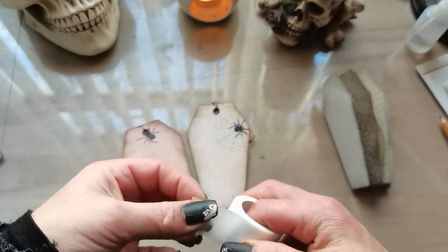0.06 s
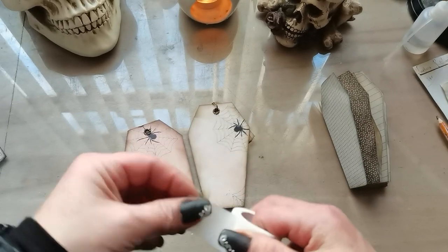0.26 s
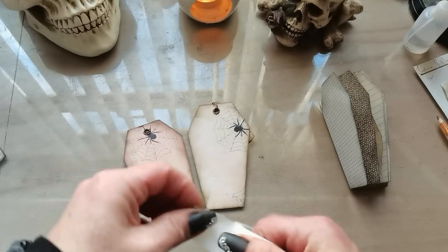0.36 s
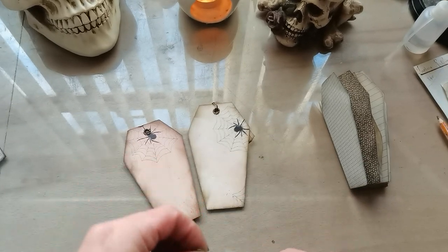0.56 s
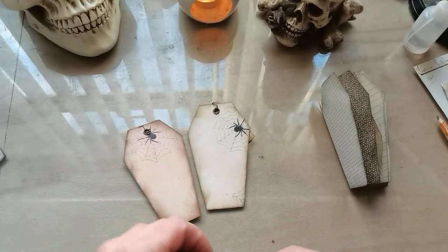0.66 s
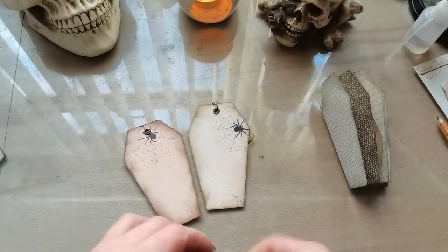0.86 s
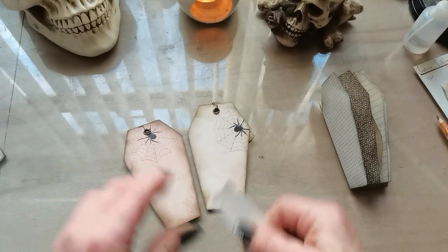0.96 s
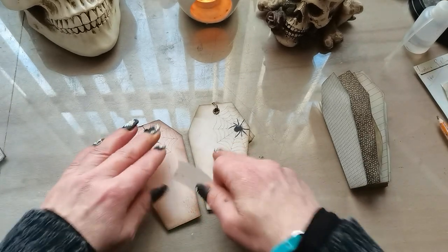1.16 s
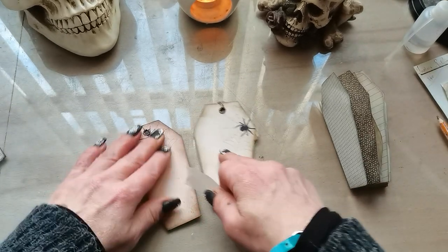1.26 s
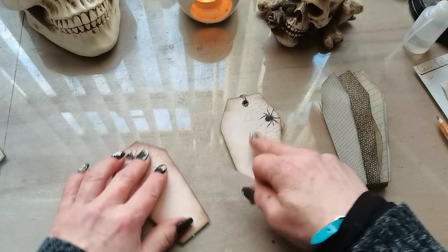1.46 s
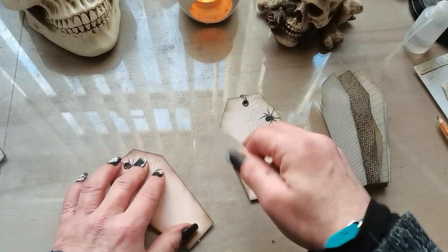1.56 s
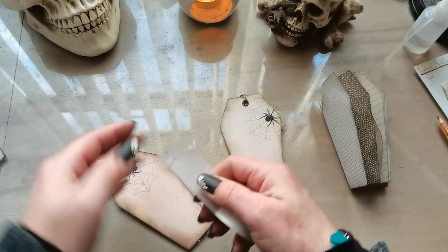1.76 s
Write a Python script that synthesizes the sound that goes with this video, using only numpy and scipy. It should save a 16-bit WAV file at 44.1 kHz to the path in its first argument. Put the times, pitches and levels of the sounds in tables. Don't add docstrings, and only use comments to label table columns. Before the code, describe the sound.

Dry, sharp rasps of paper tape being pulled and torn, followed by light card taps

```python
import sys
import numpy as np
from scipy import signal
from scipy.fft import rfft, irfft, next_fast_len
from scipy.io import wavfile
from scipy.ndimage import map_coordinates

SR = 44100
rng = np.random.default_rng(int(sys.argv[2]) if len(sys.argv) > 2 else 0)


def pcm_store(signal):
    levels = np.round(np.clip(np.atleast_2d(signal), -1, 1) * 32767)
    wavfile.write(sys.argv[1], SR, levels.astype(np.int16).T)


def field_ratio(decibels):
    return 10 ** (np.asarray(decibels, dtype=float) / 20)


N = 79380


def unit(x):
    return x / np.sqrt(np.mean(x ** 2) + 1e-20)


def along(points, hz):
    f, v = np.transpose(points)
    return np.interp(np.log(hz + 1), np.log(f + 1), v)


def wobble(rate):
    knots = rng.standard_normal(int(N * rate / SR) + 4)
    return map_coordinates(knots, [np.arange(N) * rate / SR])


def filtered(x, response):
    m = next_fast_len(N + SR // 2)
    return irfft(rfft(x, m) * response(np.fft.rfftfreq(m, 1 / SR)), m)[..., :N]


def causal(spectrum):
    def response(hz):
        cep = irfft(np.log(field_ratio(along(spectrum, hz))))
        half = len(cep) // 2
        cep[1:half] *= 2
        cep[half + 1:] = 0
        h = np.exp(rfft(cep))
        return h / np.sqrt(np.mean(np.abs(h) ** 2))
    return response


def sides(pan_db):
    return field_ratio(np.array([pan_db / 2, -pan_db / 2]))


# [f/Hz, level/dB]
HUM_COLOUR = [(30, 1), (210, -5), (330, -12), (1530, -23), (5380, -28), (7520, -21), (10300, -25),
              (16000, -29)]
# [f/Hz, likeness 0..1]
HUM_LIKENESS = [(40, 0.49), (300, 0.34), (8000, 0.12)]
HUM_DB = -66


def hum():
    def middle_and_side(hz):
        turn = np.arccos(np.clip(along(HUM_LIKENESS, hz), -1, 1)) / 2
        return field_ratio(along(HUM_COLOUR, hz)) * [np.cos(turn), np.sin(turn)]

    mid, side = filtered(rng.standard_normal((2, N)), middle_and_side)
    level = field_ratio(HUM_DB + 0.93 * wobble(5.64))
    return level * unit(np.array([mid + side, mid - side]))


# [f/Hz, fade time/s]
ROOM_FADE = [(300, 0.033), (1000, 0.23), (4000, 0.2), (7500, 0.17), (14000, 0.19)]


def room(x):
    hz, t, z = signal.stft(rng.standard_normal((2, SR // 3)), SR, nperseg=128)
    fade = field_ratio(-60 * t / along(ROOM_FADE, hz)[:, None])
    tail = signal.istft(z * fade, SR, nperseg=128)[1]
    late = np.pad(x, (90, 0))
    return signal.fftconvolve(late[None], tail / np.linalg.norm(tail[0]), axes=1)[:, :N]


# [t/s, length/s, f/Hz, level/dB]
ARM_RUBS = [(0.13, 0.14, 53, -64.5), (0.13, 0.11, 200, -70.5), (0.039, 0.011, 700, -60.5),
            (0.25, 0.013, 3200, -60.5), (0.77, 0.15, 1000, -71.5), (1.6, 0.14, 110, -68.5),
            (0.9165, 0.0099, 730, -47.5), (0.42, 0.24, 48, -61), (0.985, 0.16, 52, -65),
            (1.8, 0.18, 81, -64), (0.974, 0.17, 235, -61.5), (1.128, 0.12, 270, -64),
            (1.05, 0.36, 2350, -72), (1.362, 0.029, 2200, -71), (1.37, 0.051, 2800, -67.5),
            (1.198, 0.33, 170, -60.5)]


def arms():
    t = np.arange(N) / SR
    out = 0
    for s, length, hz, db in ARM_RUBS:
        swell = np.exp(-8 * ((t - s) / length) ** 2)
        out = out + field_ratio(db) * swell * np.sin(2 * np.pi * hz * t + 1.56 * wobble(hz / 3))
    return out


def ring(modes, pitch=1):
    t = np.arange(SR // 4) / SR
    out = 0
    for hz, db, t60 in modes:
        out = out + field_ratio(db + rng.normal(0, 3.2) - 60 * t / t60) * np.sin(2 * np.pi * pitch * hz * t)
    return out


# [t/s, edge level/dB, thud level/dB, edge pitch factor]
CARD_TAPS = [
    (1.1775, -24.5, -43, 1.01),
    (1.182, -57, -50, 0.76),
    (1.187, -52, -42.5, 1.001),
    (1.2684, -31.5, -59, 1.163),
    (1.726, -74.5, -55.5, 0.9),
]
# [f/Hz, level/dB, fade time/s]
EDGE_TONES = [(2610, -17, 0.0099), (3965, 11, 0.0076), (5130, -0.5, 0.008), (6800, -2, 0.0051)]
# [f/Hz, level/dB, fade time/s]
TABLE_TONES = [(80.5, -4, 0.14), (189, 0.5, 0.038), (246.5, -1.5, 0.051), (376, -4.5, 0.068),
               (630, -5.5, 0.029)]
# [t/s, length/s, starting f/Hz, level/dB]
TAPE_SQUEAKS = [
    (0.271, 0.027, 691, -62.5),
    (1.716, 0.15, 2200, -68.5),
]


def card():
    out, t = np.zeros(N + SR), np.arange(SR // 4) / SR
    for s, edge_db, thud_db, pitch in CARD_TAPS:
        click = field_ratio(edge_db) * ring(EDGE_TONES, pitch) * np.tanh(t / 0.00034)
        thud = field_ratio(thud_db) * ring(TABLE_TONES) * (1 - np.exp(-t / 0.0026))
        out[round(s * SR):][:len(t)] += click - thud
    for s, length, hz, db in TAPE_SQUEAKS:
        swell = np.sin(np.pi * np.clip(t / length, 0, 1))
        phase = 2 * np.pi * hz * t * (1 - 0.29 * t) + 1.7 * wobble(120)[:len(t)]
        out[round(s * SR):][:len(t)] += field_ratio(db) * swell * np.sin(phase)
    return out[:N] * np.ones((2, 1))


# [centre t/s, length/s, level/dB, left-right pan/dB]
STROKES = [(0.046, 0.09, -59, -1.5), (0.279, 0.043, -59, -12), (0.546, 0.099, -37, 16),
           (0.767, 0.16, -49.5, -1), (0.856, 0.092, -40.5, -4), (0.91, 0.047, -38.5, -5),
           (0.98, .12, -74, 7), (1.087, 0.029, -76, -1), (1.123, 0.11, -59, -4), (1.281, 0.063, -47, 5.5),
           (1.378, 0.15, -51, 0), (1.459, 0.19, -62.5, -3.5), (1.572, 0.06, -71.5, 1.5),
           (1.647, 0.099, -64, 11.5), (1.734, 0.17, -63.5, 0)]
# [f/Hz, level/dB]
RUB_COLOUR = [(500, -31), (1640, -21), (4000, -15), (7400, 2), (9000, -7.5), (10300, -2), (13000, -13),
              (16500, -17)]
QUICK_S = 0.1


def fingers():
    t = np.arange(N) / SR
    grain_db = 2.25 * rng.exponential(1, N) + 1.18 * wobble(39.93) + 1.7 * wobble(280)
    grit = field_ratio(grain_db) * rng.standard_normal((3, N))
    pair = unit(filtered(0.56 * grit[0] + 0.88 * grit[1:], causal(RUB_COLOUR)))
    strokes = 0
    for s, length, db, pan_db in STROKES:
        onset = 220 if length < QUICK_S else 30
        steepness = np.where(t < s - 0.2 * length, onset, 5)
        swell = np.exp(-steepness * ((t - s) / length + 0.18) ** 2)
        strokes = strokes + field_ratio(db) * sides(pan_db)[:, None] * swell
    return pair * strokes


SPIKE = 1.2
SPIKY_DB = 2
NEAR_DB, NEAR_S = -13.5, 0.029


def cluster(t, ms, count):
    span = max(ms, 0.2) / 1000
    shape = np.exp(-np.abs(t) / span * np.where(t < 0, 3.5, 2.2))
    after = field_ratio(NEAR_DB - 60 * t / NEAR_S) * (t > 0)
    size = field_ratio(SPIKY_DB * rng.exponential(1, len(t))) * rng.standard_normal((count, len(t)))
    size = size / np.sqrt((shape * size ** 2).sum(axis=1, keepdims=True) / shape.sum())
    return (shape + after) * np.where(shape == shape.max(), SPIKE, size)


# [t/s, crack level/dB, roll core level/dB, roll wall level/dB, cluster length/ms] # tape
JERKS = [(0.1908, -27.5, -68, -47.5, 0.46), (0.214, -22.5, -54.5, -41.5, 1.5), (0.2638, -44, -87, -79, 5.3),
         (0.2679, -39.5, -84, -63, 1.5), (0.2751, -44, -82, -68, 2.7), (0.2887, -50, -78, -74, 6.5),
         (0.3471, -40.5, -60, -73.5, 1), (0.3698, -33.5, -48, -57, 1), (0.3734, -20.5, -39, -37, 1.3),
         (0.383, -29, -54, -51.5, 1.3), (0.393, -33.5, -58, -44, 2.8), (0.3996, -31, -50, -36.5, 0.75),
         (0.4009, -16.5, -39.5, -33, 2.95), (0.4031, -26, -29.5, -46.5, 0.39),
         (0.4075, -36, -45, -63.5, 1.8), (0.4113, -42.5, -47, -64, 3.4), (0.4273, -25.5, -40.5, -38, 3.4),
         (0.4467, -35.5, -40.5, -47.5, 1.1), (0.4688, -28, -45, -42.5, 1.4),
         (0.5, -26.5, -38, -41, 0.82), (0.503, -19.5, -42.5, -36, 1.7), (0.5084, -14.5, -40, -38.5, 0.47),
       (0.5113, -17, -45.5, -56, 0.81), (0.5256, -15, -31, -29, 1.5), (0.5287, -30, -57, -34, 2.8),
       (0.5359, -27.5, -44, -38.5, 5.9), (0.5425, -21, -34, -28.5, 1.6), (0.549, -11, -43, -24.5, 0.34),
       (0.557, -11.5, -33, -29, 0.88), (0.57, -15, -36, -29.5, 2),
         (0.8127, -46.5, -63.5, -69, 27), (0.836, -32.5, -46.5, -47, 1.13), (0.8461, -32.5, -56, -54, 0.96),
        (0.8532, -28, -49.5, -50, 1.25), (0.8593, -24.5, -53, -46.5, 0.35), (0.8853, -42, -61, -58, 9.3),
        (0.8973, -41.5, -58, -53, 0.6), (0.8989, -41, -48, -50, 0.93), (0.9078, -35, -44, -39, 0.7),
        (0.9098, -23.5, -48, -41.5, 0.42), (0.9154, -20.5, -45.5, -40.5, 2.7),
        (0.9162, -14, -43.5, -41, 0.4), (0.9187, -31, -48, -41, 1.1), (0.9273, -52, -69, -54, 2)]
TICKS = [(0.0322, -45, -73, -74, 2.3), (0.089, -55.5, -76, -75, 6.2), (1.1053, -53.5, -63.5, -69.5, 3.7),
         (1.178, -45, -43.5, -28, 0.88), (1.1849, -27.5, -42.5, -39, 2.8), (1.1934, -38.5, -65, -54, 2.3),
         (1.2685, -33, -83, -50, 0.7), (1.2807, -34, -66, -48, 0.72), (1.342, -54, -100, -78, 3.4),
         (1.361, -45.5, -90, -52.5, 5.8), (1.3864, -42, -87, -51, 0.42), (1.511, -51.5, -80, -71, 0.8),
         (1.635, -49, -82, -82.5, 2.5), (1.6557, -37.5, -87, -80, 0.76)]
# [t/s, level/dB, length/ms]
SPARKS = [
    (0.2144, -44, 3.3),
    (0.2635, -39, 3.5),
    (0.4016, -18.5, 2.2),
    (0.4075, -28, 2.9),
    (0.4122, -31, 3),
    (0.5418, -20, 4.1),
    (0.836, -28, 0.91),
    (0.8995, -45, 2),
    (1.1925, -51, 2.5),
]
# [t/s, treble level/dB, left-right lean/dB]
FACING = [(0.03, -11, 2.5), (0.2, -3, 1), (0.38, 2, 0.5), (0.405, 2, -2.5), (0.428, 5, -1.5),
          (0.447, 11.5, 9), (0.47, 9.5, -2), (0.503, -1.5, -3.5), (0.53, 1, -2), (0.57, -2.5, 0),
          (0.82, 1, 3.5), (0.9, 2, -0.5), (0.917, -5.5, 8.5), (1.1, 6, -1.5), (1.185, 6.5, 0.5),
          (1.268, -5, 1), (1.282, 5, -9), (1.64, -8, 2)]
# [f/Hz, level/dB]
CRACK_COLOUR = [(2000, -41), (5400, -18.5), (6500, -7), (7500, 4), (8600, -9), (9400, -16), (12000, -33)]
# [f/Hz, level/dB]
SHEEN_COLOUR = [(6000, -34.5), (8800, -12.5), (10300, 2), (11500, -3.5), (14500, -11), (15800, -18),
                (17000, -34)]
# [f/Hz, level/dB]
FIZZ_COLOUR = [(8000, -35), (11000, -5.5), (12500, -7), (15500, -13.5), (17000, -17)]
# [f/Hz, level/dB]
CORE_COLOUR = [(120, -63), (350, -15.5), (650, -7), (950, -3.5), (1300, -6.5), (1800, -14.5), (3000, -32.5)]
# [f/Hz, level/dB]
WALL_COLOUR = [(1500, -41), (1900, -13), (2700, -6), (3400, -8.5), (4200, 3.5), (5300, -7), (7000, -23.5)]
SHEEN_DB, BODY_DB = -3, 1.37


def snaps():
    cracks, fizz = np.zeros((2, N + SR)), np.zeros((2, N + SR))
    core, wall = np.zeros(N + SR), np.zeros(N + SR)
    t = np.arange(SR // 20) / SR - 0.008

    def at(s):
        start = round((s + t[0]) * SR)
        return slice(start, start + len(t))

    for s, db, core_db, wall_db, ms in JERKS + TICKS:
        size = cluster(t, ms, count=5)
        cracks[:, at(s)] += field_ratio(db - 3.0) * (0.44 * size[0] + 1.238 * size[1:3])
        late_boost = 1 + 2 * (t > ms / 1000)
        core[at(s)] += field_ratio(core_db + BODY_DB - 2.0) * size[3] * late_boost
        wall[at(s)] += field_ratio(wall_db + 6.0) * size[4]
    for s, db, ms in SPARKS:
        fizz[:, at(s)] += field_ratio(db) * cluster(t, ms, count=2)

    s, treble_db, lean_db = np.transpose(FACING)
    now = np.arange(N) / SR
    treble_db, lean_db = np.interp(now, s, treble_db), np.interp(now, s, lean_db)
    cracks = cracks[:, :N] * sides(lean_db)
    tape = filtered(cracks, causal(CRACK_COLOUR))
    tape = tape + filtered(cracks * field_ratio(SHEEN_DB + treble_db), causal(SHEEN_COLOUR))
    tape = tape + filtered(fizz[:, :N], causal(FIZZ_COLOUR))
    return tape + filtered(core[:N], causal(CORE_COLOUR)), filtered(wall[:N], causal(WALL_COLOUR))


WET_DB, WALL_WET_DB = -9.5, -2


def scene():
    tape, wall = snaps()
    tap = card()
    into_room = (tape + field_ratio(WALL_WET_DB) * wall + 0.36 * tap).mean(axis=0)
    close = tape + wall + tap
    return close + field_ratio(WET_DB) * room(into_room) + fingers() + arms() + hum()


def band_limit(x):
    return signal.sosfilt(signal.butter(12, 16990, fs=SR, output="sos"), x)


# [f/Hz, half width/Hz, level/dB]
HOUSING = [(3166, 140, -4), (5240, 750, 0.5), (8870, 150, -8)]
# [f/Hz, left-right level/dB]
PORT_LEAN = [(30, -14), (125, -9.5), (1000, -2.5), (2500, -1), (5500, 4.5), (10000, 1), (14000, -5.5)]
TOP_HZ = 16130
LAG_S = 4 / 44100


def record(dry):
    def ports(hz):
        low_cut = hz ** 2 / (hz ** 2 + 22 ** 2)
        housing_db = sum(db * np.exp(-((hz - c) / w) ** 2) for c, w, db in HOUSING)
        top_db = -30 / (1 + np.exp((TOP_HZ - hz) / 120))
        delay = np.exp(-1j * np.pi * hz * LAG_S * np.array([[1], [-1]]))
        return low_cut * field_ratio(housing_db + top_db) * sides(along(PORT_LEAN, hz)) * delay

    mix = filtered(dry, ports)
    return band_limit(mix)


dry = scene()
out = record(dry)
pcm_store(out)
```